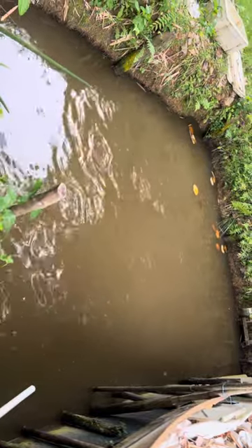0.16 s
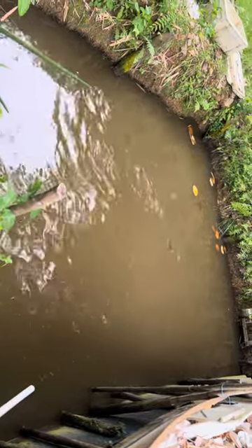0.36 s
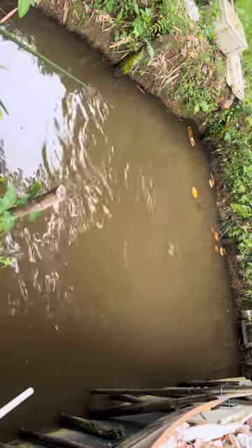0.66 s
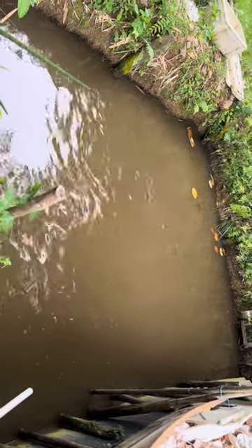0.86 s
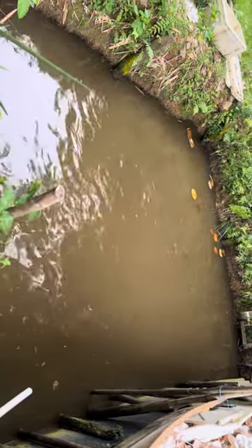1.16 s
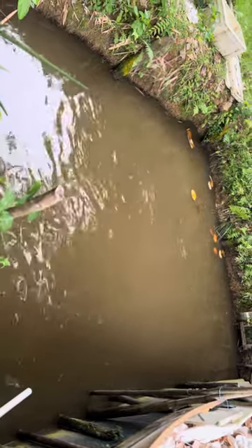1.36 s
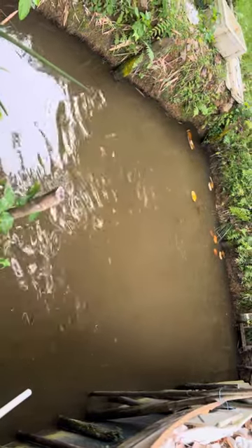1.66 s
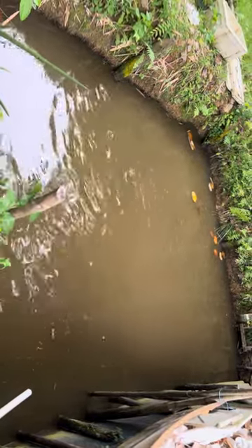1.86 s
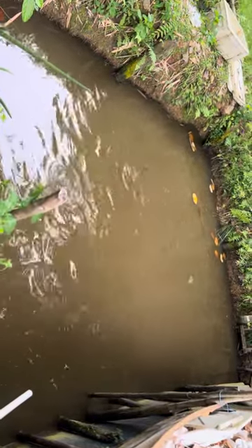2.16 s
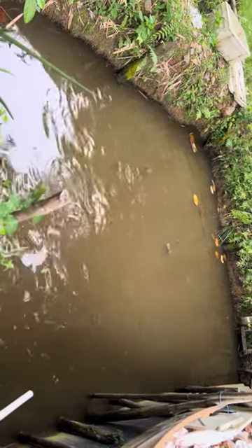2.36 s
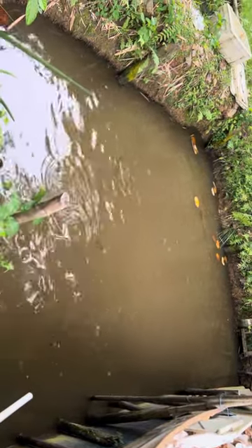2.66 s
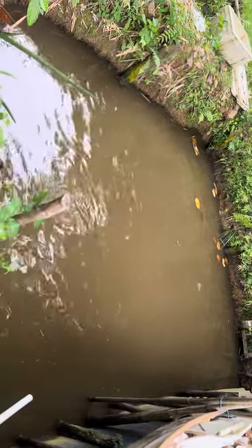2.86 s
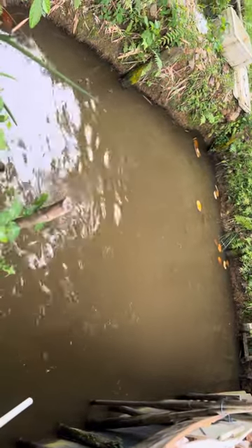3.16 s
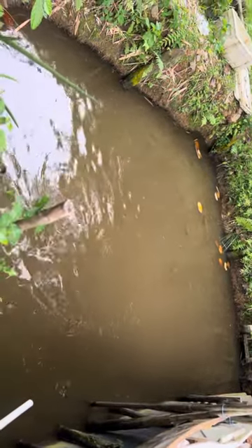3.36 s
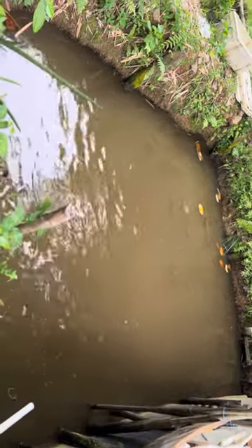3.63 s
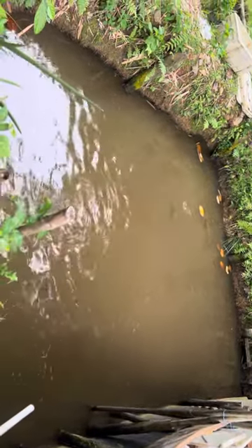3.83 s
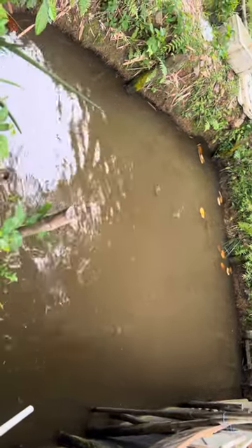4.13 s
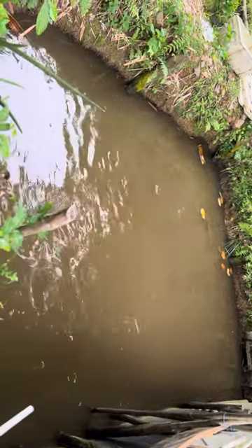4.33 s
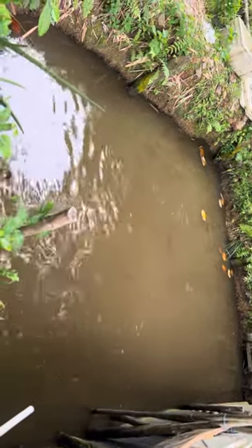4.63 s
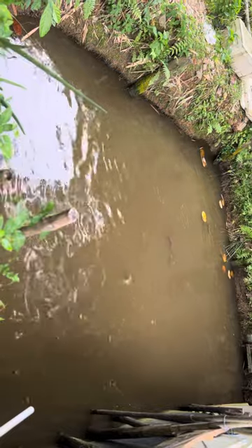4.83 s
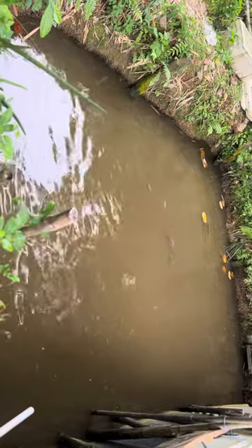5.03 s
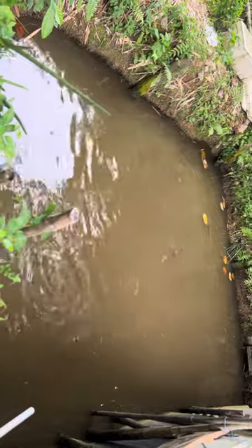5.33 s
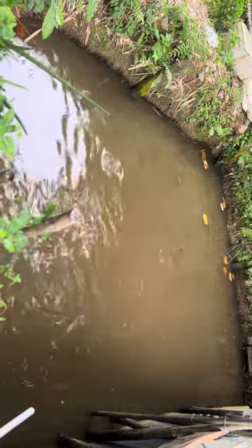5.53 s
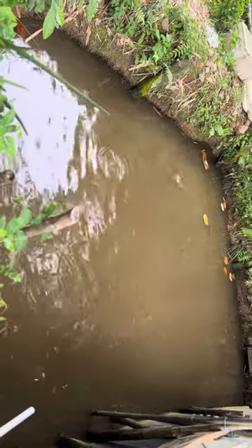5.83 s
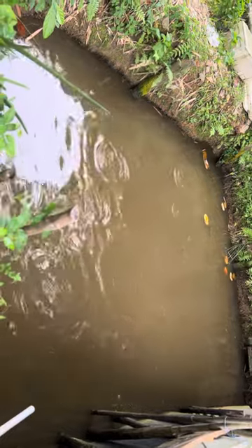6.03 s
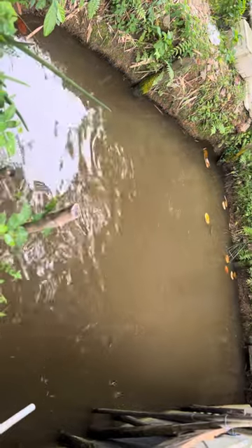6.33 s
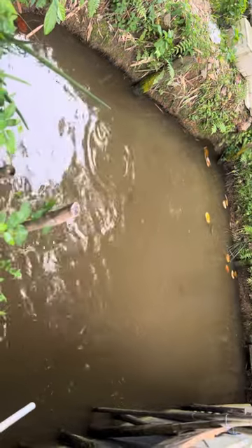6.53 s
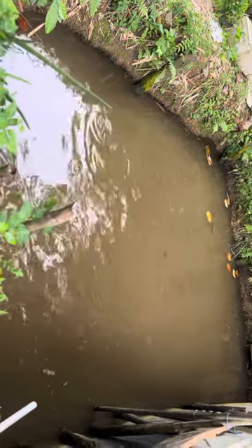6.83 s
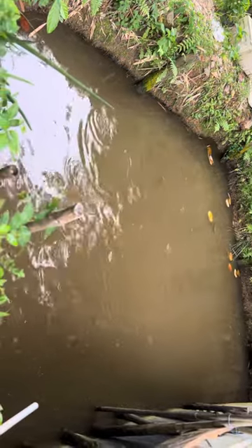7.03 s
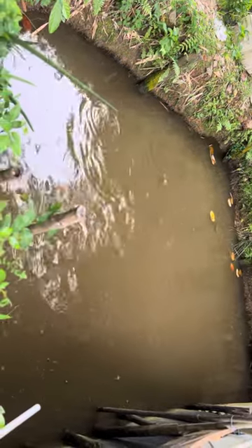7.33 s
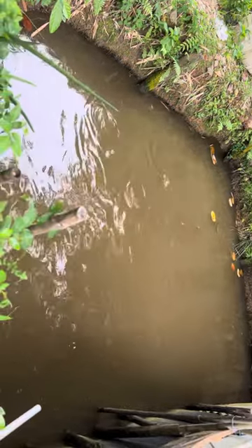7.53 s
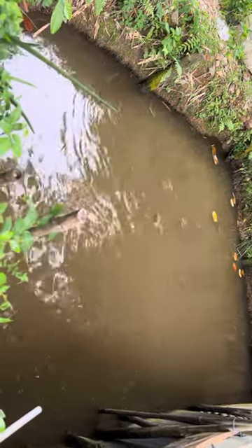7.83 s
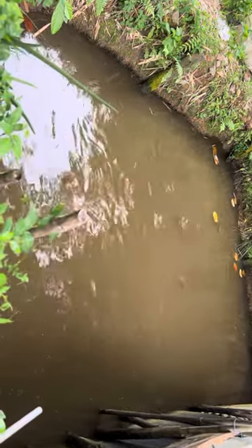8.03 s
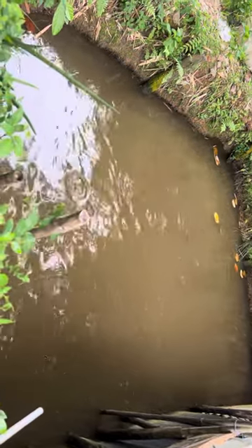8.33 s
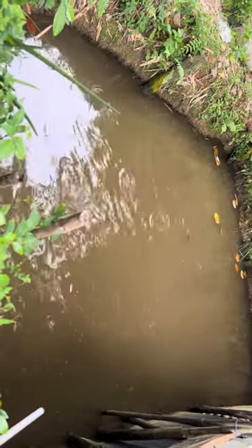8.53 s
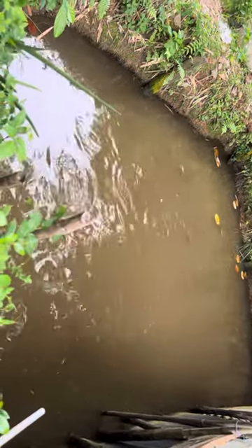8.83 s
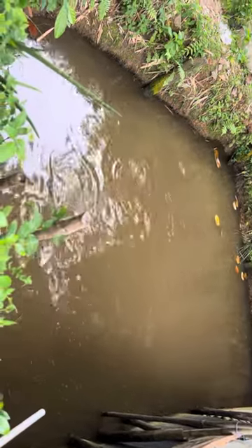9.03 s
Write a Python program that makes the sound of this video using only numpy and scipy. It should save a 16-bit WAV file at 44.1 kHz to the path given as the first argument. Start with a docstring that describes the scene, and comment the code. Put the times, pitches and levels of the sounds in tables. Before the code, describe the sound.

Beside a muddy, leafy pond, small animals give short rising chirps two or three times a second, echoing off the banks. A distant motorbike revs and fades over low rumble, road wash and thin insect buzz. A faint raspy squeak comes early, then ticks, soft plops and bubbles. Near the end a brittle snap is the loudest sound, close to the microphone, as a fainter motorbike revs.

```python
"""Beside a muddy pond, small animals call all the way through in short rising chirps, swept tones with echoes.
At first a motorbike, a stack of firing harmonics, revs up far off over rumble, wash, hiss and insect buzz.
A raspy squeak rings at 1.4 s; from 2.7 s come noise ticks, narrow noisy trills and gliding water plops.
Rising bubbles gurgle from 4.8 s, a fainter motorbike joins at 6.9 s and a run of cracks snaps close by at 7.9 s."""
import sys
import numpy as np
from scipy import signal
from scipy.fft import rfft, irfft
from scipy.io import wavfile
from scipy.ndimage import uniform_filter1d

SR = 44100
rng = np.random.default_rng(int(sys.argv[2]) if len(sys.argv) > 2 else 0)


def master_out(mix):
    """Clip the mix to full scale and print it as 16-bit PCM to the path in sys.argv[1]."""
    frames = np.transpose(np.atleast_2d(mix))
    ceiling = np.clip(frames, -1, 1)
    pcm = np.round(ceiling * 32767).astype(np.int16)
    wavfile.write(sys.argv[1], SR, pcm)


N = 404838
TIME = np.arange(N) / SR

CALL_LEAD_S, CALL_LEAD_DB = 0.035, -10.5  # a faint glide leads into each sweep from below
LOUD_CALL_DB = -42.5  # in calls softer than this the fundamental stands out more
# The animals' calls. Each row: start in seconds, length in seconds, top of the strong second partial in Hz,
# level in dB (rms over a typical call length), far echo in dB, third partial in dB against the second,
# swell from 0 (abrupt) to 1 (gradual).
CHIRPS = [ (-.05, 0.11, 1663, -52, 0, -17, 0.15), (0.317, 0.12, 1657, -54.5, -0.5, -17, 0.27),
          (0.826, 0.098, 1860, -52.5, -4, -18, 0.26), (1.226, 0.15, 1685, -55.5, 2, -25, .1),
          (1.605, 0.097, 1877, -51.5, 0, -23, 0.28), (2.009, 0.098, 1646, -55.5, 8, -19, 0.14),
          (2.37, 0.1, 1855, -50, 3, -35, 0.15), (2.705, 0.08, 1737, -45, 2, -18, 0.41),
          (2.777, 0.082, 1918, -50.5, 9, -16, 0.41), (3.105, 0.13, 1894, -50.5, -1.5, -34, 0.076),
          (3.295, .085, 1927, -52.5, 4.5, -27, 0.3), (3.468, 0.08, 1640, -55.5, -3, -21, 0.046),
          (3.56, .088, 1790, -43, -4.5, -23, 0.77), (3.668, 0.1, 1960, -53.5, 4, -25, 0.6),
          (4.023, .11, 1930, -51.5, 1, -24, 0.38), (4.278, 0.093, 1836, -42, -3, -25, 0.29),
          (4.406, 0.11, 1925, -53, 3.5, -24, 0.44), (4.844, 0.1, 1820, -41, -5.5, -23, 0.36),
          (5.212, 0.089, 1837, -43, -5, -17, 0.72), (5.56, 0.096, 1823, -43.5, -2.5, -16.5, 0.49),
          (5.871, 0.077, 1691, -52, 3, -8, 0.44), (5.907, 0.11, 1819, -51, -17, -13, .5),
          (6.445, .11, 1870, -64, 0, -21, .2), (6.7, 0.089, 1780, -54.5, -2, -30, .25),
          (7.18, .11, 1857, -61, -2, -30, .1), (7.367, 0.097, 1786, -52, -3.5, -16, 0.44),
          (7.543, 0.14, 1940, -60.5, -1, -23, .2), (7.886, .135, 1860, -58, -2, -32, .2),
          (8.221, 0.091, 1807, -51, 5, -24, 0.38), (8.412, 0.083, 1600, -59, 1, -36, .25),
          (8.614, 0.1, 1807, -50.5, 3.5, -32, 0.23), (8.979, 0.093, 1830, -50, 0, -31, .45)]
# Distinct reflections, which beat with the sweep and roughen it. Each row: delay in seconds, level in dB.
REFLECTIONS = [(0.011, -6.5), (0.019, -4), (.075, -13.5)]


def chirps(low_db=-21, low_share=0.64, third_fade_s=0.39, rough=0.29, air_db=-18, scatter=1.65,
           typical_s=0.11, near_t60=0.25, far_t60=0.6, size=36000):
    """The throat favours the second partial, most of all in loud calls; reflections blur the weak partials."""
    out = np.zeros((2, N))
    t = np.arange(size) / SR
    build = np.minimum(0.4 + t / 0.07, 1)  # echoes from the far bank take a moment to build up
    for s, length_s, top_hz, db, echo_db, third_db, swell in CHIRPS:
        phase, effort, throat = whistle(t - CALL_LEAD_S, length_s, top_hz, swell)
        voice = (1 + rough * quiver(size)) * np.sin(2 * phase)
        call = effort * throat * (voice + undb(air_db) * air(size))
        reflected = sum(undb(gain_db) * np.interp(t - late_s, t, call, left=0)
                        for late_s, gain_db in REFLECTIONS)
        low = undb(low_db + low_share * (LOUD_CALL_DB - db)) * np.sin(phase)
        third = undb(third_db) * np.exp(-t / third_fade_s) * np.sin(3 * phase)
        source = call + effort * (low + third)
        near_path = echoes(near_t60, 2200, size=size)  # close scatter beats with the direct sound
        far_path = build * echoes(far_t60, 2700, size=size)
        near, far = (unit(signal.fftconvolve(source[None], path)[:, :size]) for path in (near_path, far_path))
        heard = unit(unit(call + reflected) + scatter * near + undb(echo_db) * far)
        add(out, s - CALL_LEAD_S, heard * undb(db) * np.sqrt(typical_s * SR / size))
    return out


# Every chirp's second partial sweeps up from the same pitch and holds its top for a moment.
CALL_START_HZ, CALL_HOLD_S = 1214, 0.011
# How strongly the throat passes the second partial. Each row: frequency in Hz, gain in dB.
THROAT = [(1200, -9), (1350, -6.5), (1450, -2.5), (1600, 0), (1780, -1.5), (1950, -3)]


def whistle(t, length_s, top_hz, swell, waver=0.0087, bend=1.2):
    """Fundamental phase, effort and throat gain of one call: it sweeps up, swells, holds a moment and stops."""
    u = np.minimum(t / length_s, 1)
    hz = top_hz - (top_hz - CALL_START_HZ) * (1 - u) ** bend  # second partial
    lead_in = undb(CALL_LEAD_DB) * np.minimum(1 + t / CALL_LEAD_S, 1)
    rise = np.maximum(u, 0) ** max(swell, 0.01)
    stop = np.clip((length_s + CALL_HOLD_S - t) / 0.01, 0, 1)
    effort = np.maximum(rise, lead_in) * stop
    phase = np.pi * np.cumsum(hz * (1 + waver * quiver(len(t)))) / SR  # pi, not 2 pi: half the pitch
    return phase, effort, colour(hz, THROAT)


def quiver(size):
    """Quick, smooth unsteadiness of a voice, rms 1."""
    return unit(uniform_filter1d(uniform_filter1d(rng.standard_normal(size), size=200), size=200))


def air(size, centre_hz=1600, width_hz=480):
    """Air rushing through the throat's resonance, rms 1."""
    hz = np.arange(size // 2 + 1) * SR / size
    return unit(irfft(rfft(rng.standard_normal(size)) * band(hz, centre_hz, width_hz), size))


CRACK_T60_S, CRACK_WIDTH = 0.0093, 0.72  # decay by 60 dB; filter width as a share of the centre frequency
# The snap is a quick run of cracks. Each row: start in seconds, peak in dB, centre in Hz.
SNAP = [(7.8615, -38, 2800), (7.868, -21, 2043), (7.87, -29, 5620), (7.8764, -27, 6310), (7.878, -39, 7940)]
# What the snapped thing rings with after its loudest crack. Each row: centre in Hz, filter width in Hz,
# peak in dB, time to decay by 60 dB in seconds.
SNAP_RING = [(990, 2500, -30.5, 0.036), (2300, 2200, -33, 0.015), (2450, 1200, -56, .2),
             (12600, 2160, -42.5, 0.099)]


def snap(ring_delay_s=0.003, spatter_delay_s=0.017):
    """Something brittle gives way in a few cracks and rings briefly after the loudest; small bits spatter."""
    out = np.zeros((2, N))
    for s, db, hz in SNAP:
        add(out, s, burst(db, hz, CRACK_WIDTH * hz, CRACK_T60_S))
    loudest_s = max(SNAP, key=lambda crack: crack[1])[0]
    for hz, width, db, t60 in SNAP_RING:
        add(out, loudest_s + ring_delay_s, burst(db, hz, width, t60))
    return out + spatter(loudest_s + spatter_delay_s)


TICK_WIDTH = 0.95  # filter width as a share of the centre frequency
# The spatter's length, highest first peak, change over its length and middle pitch.
SPATTER_S, SPATTER_DB, SPATTER_FADE_DB, SPATTER_HZ = 0.07, -43, -11, 1910


def spatter(s, spread_octaves=1.5, t60=0.022, scatter_db=6, count=30):
    """A grainy, fading spray of tiny ticks at random pitches."""
    out = np.zeros((2, N))
    for k, (late, pitch, weaker) in enumerate(rng.random((count, 3))):
        u = (k + late) / count
        hz = SPATTER_HZ * 2 ** (spread_octaves * (2 * pitch - 1))
        db = SPATTER_DB + SPATTER_FADE_DB * u - scatter_db * weaker
        add(out, s + u * SPATTER_S, burst(db, hz, TICK_WIDTH * hz, t60, size=3000))
    return out


RING_HZ = 300  # the lengths below hold at this pitch
# Length in seconds, and end pitch over start pitch.
PLOP_S, PLOP_GLIDE = 0.013, 0.745
BUBBLE_S, BUBBLE_GLIDE = 0.036, 1.435
# Plops, which sink in pitch. Each row: start in seconds, start pitch in Hz, peak in dB.
PLOPS = [ (2.949, 430, -46), (3.519, 445, -43), (3.954, 104, -38.5), (4.264, 316, -43), (4.274, 69.5, -30),
         (4.429, 300, -51), (4.438, 76.7, -26.5), (5.199, 324.7, -43.5), (5.546, 300, -42.5),
         (5.834, 418, -43.5), (6.245, 198.5, -37.5), (6.424, 108, -30), (6.607, 320, -49),
         (7.879, 530, -37), (8.762, 487.5, -42)]
# Gurgling bubbles, which rise in pitch. Each row: start in seconds, start pitch in Hz, peak in dB.
BUBBLES = [(4.814, 1340, -57.5), (5.368, 1160, -51), (5.389, 944, -48.5), (5.706, 272, -42.5),
           (5.738, 405.8, -48), (5.762, 674.4, -48)]


def plops(rows, length_s, glide, fade=1.0):
    """Air pockets in the water ring briefly, gliding as they change size; big, low ones last longer."""
    out = np.zeros((2, N))
    for s, hz, db in rows:
        u = np.linspace(0, 1, int(length_s * np.sqrt(RING_HZ / hz) * SR))
        phase = 2 * np.pi * np.cumsum(hz * glide ** u) / SR
        ring = np.minimum(u / 0.086, 1) * np.exp(-fade * u) * np.minimum((1 - u) / 0.028, 1)
        add(out, s, undb(db) * ring / ring.max() * np.sin(phase))
    return out


# Ticks in clusters: time to decay by 60 dB, filter width, and how much weaker than the peak a tick may be.
CLUSTER_T60_S, CLUSTER_WIDTH_HZ, CLUSTER_SCATTER_DB = 0.062, 1600, 14
# Faint ticks and taps. Each row: start in seconds, peak in dB, centre in Hz,
# time to decay by 60 dB in seconds.
TICKS = [ (2.75, -42, 1390, .04), (2.788, -54, 4950, 0.017), (3.4991, -46, 3080, .015),
         (3.5185, -33, 1160, 0.01), (4.481, -52, 2300, 0.046), (5.167, -52, 4020, 0.046),
         (5.1981, -35.5, 1060, 0.021), (5.382, -50, 2700, .04), (5.833, -41, 1300, 0.032),
         (6.64, -59, 8910, .04), (7.493, -45.5, 1299, 0.039), (7.755, -48, 3400, .03),
         (7.797, -48.5, 3397, 0.022), (8.585, -48, 2290, 0.038), (8.778, -46, 2490, 0.032)]
# Faint clusters of tiny noise ticks, very high near 13 kHz but for one near 6 kHz.
# Each row: start in seconds, length in seconds, highest peak in dB, centre in Hz.
TICK_CLUSTERS = [(2.716, 0.1, -58, 13300), (2.937, .1, -61, 13200), (3.094, 0.069, -63, 13300),
                 (3.499, 0.064, -51, 5950), (5.22, 0.13, -61, 13100)]


def ticks(count=7):
    """Small dry sounds, each a decaying noise burst: single ticks, and clusters scattered at random in time."""
    out = np.zeros((2, N))
    for s, db, hz, t60 in TICKS:
        add(out, s, burst(db, hz, TICK_WIDTH * hz, t60))
    for s, length_s, db, hz in TICK_CLUSTERS:
        for when, weaker in rng.random((count, 2)):
            tick = burst(db - CLUSTER_SCATTER_DB * weaker, hz, CLUSTER_WIDTH_HZ, CLUSTER_T60_S)
            add(out, s + when * length_s, tick)
    return out


SQUEAK_AT_S, SQUEAK_S, SQUEAK_T60_S = 1.395, 0.056, 0.024  # start, length, decay of each jerk by 60 dB
# Resonances of one raspy squeak. Each row: centre in Hz, filter width in Hz, peak of the first jerk in dB.
SQUEAK = [(3310, 480, -50.5), (4640, 350, -48), (5350, 580, -52.5), (3800, 5100, -48)]


def squeak(jitter=0.17, fall_db=-4, tail_db=-4, tail_t60=0.31, count=7):
    """A quick run of stick-slip jerks rings a few high resonances; the banks draw it out."""
    out = np.zeros((2, N))
    for k, late in enumerate(rng.standard_normal(count)):
        s = SQUEAK_AT_S + SQUEAK_S * (k + jitter * late) / count
        for hz, width, db in SQUEAK:
            add(out, s, burst(db + fall_db * k / count, hz, width, SQUEAK_T60_S))
    tail = signal.fftconvolve(out[:1], echoes(tail_t60, 6000))[:, :N]
    return out + undb(tail_db) * tail


def burst(db, hz, width, t60, spread=0.81, size=16000):
    """A short burst of tiny fractures, as decaying noise, through one broad resonance."""
    t = np.arange(size) / SR
    mid, side = rng.standard_normal((2, size)) * undb(-60 * t / t60)
    b, a = signal.iirpeak(min(hz, SR / 2 - 1000), hz / min(width, SR / 3), fs=SR)
    once = signal.lfilter(b, a, [mid + spread * side, mid - spread * side])
    sound = signal.lfilter(b, a, once)  # the second pass steepens the resonance
    return sound / abs(sound).max() * undb(db)


# Steady buzzers. Each row: centre in Hz, width in Hz, pulses per second, pulse depth,
# level in dB before the slow swell.
INSECTS = [(7052, 330, 43, 0.066, -67.5), (8114, 830, 230, 0.092, -69.5), (8130, 88, 130, 0.42, -90.5),
           (9230, 590, 330, 0.075, -72), (6840, 890, 5, 0.85, -76)]
# One more insect sings in bouts. Each row: start in seconds, end in seconds.
BOUTS = [(.65, 1.2), (1.88, 2.25), (3.05, 4.8), (4.2, 5.8), (5.4, 12), (7.65, 8.14)]


def insects(bout_width_hz=240, bout_db=-73, flicker_db=0.6):
    """Wing strokes pulse narrow high resonances; one insect starts and stops."""
    def buzz(centre, width, rate, depth):
        """Noise in one resonance, pulsed by slightly unsteady strokes."""
        strokes = 1 + depth * np.sin(2 * np.pi * np.cumsum(rate * (1 + 0.0037 * walk(3.5))) / SR)
        hz = np.arange(N // 2 + 1) * SR / N
        ring = irfft(rfft(rng.standard_normal(N)) * band(hz, centre, width), N)
        return unit(ring * strokes) * undb(flicker_db * walk(3.5))
    chorus = sum(buzz(hz, width, rate, depth) * undb(db) for hz, width, rate, depth, db in INSECTS)
    bouts = sum(1.0 * ((TIME > a) & (TIME < b)) for a, b in BOUTS)  # overlapping bouts add up
    singing = uniform_filter1d(bouts, size=3000)
    soloist = singing * buzz(8920, bout_width_hz, 86, 0.9)
    swell_db = np.interp(TIME, [0, 4, 9], [-1.6, 0.3, 1.1])
    return from_side(chorus * undb(swell_db) + soloist * undb(bout_db))


# Faint far-off trills. Each row: start in seconds, end in seconds, centre in Hz, level in dB.
TRILLS = [(2.713, 3.1, 3270, -65), (3.6, 5.902, 2890, -75), (6.239, 6.519, 4632, -79),
          (6.44, 6.658, 4000, -79), (6.67, 6.98, 3100, -79), (6.83, 7.182, 3980, -76),
          (6.9, 7.6, 4500, -78.5), (7.28, 7.432, 3960, -73)]


def trills(width_hz=330, fade_s=0.055, flicker_db=1):
    """Far-off trills, blurred by distance to narrow flickering bands."""
    out = np.zeros((2, N))
    for start, end, hz, db in TRILLS:
        noise = diffuse(lambda f: band(f, hz, width_hz))
        out += noise * gate(start, end, fade_s) * undb(db + flicker_db * walk(25))
    return out


BIKE_FADE_S, COAST_S = 0.72, 1.08  # fade in and out; time from throttle shut to silence
# The exhaust colour moves up with the revs: firing rate at which it stands as listed, and
# the share of the rise (in octaves) that it follows.
EXHAUST_AT_HZ, EXHAUST_FOLLOW = 42, 0.38
# Motorbikes pulling away. Each row: start in seconds, throttle shut in seconds, top firing rate in Hz,
# growth of the rate per second, level at the top in dB before the exhaust colour.
BIKES = [(-.6, 2.4, 47.82, .128, -42), (6.9, 9.2, 43.23, .151, -49.5)]
# Their exhaust as it carries over the distance. Each row: frequency in Hz, gain in dB.
EXHAUST = [(35, -17.5), (75, -1.5), (115, 0.5), (160, -12), (205, -18.5), (250, -3.5), (300, 0.5),
           (345, -10.5), (400, -9), (490, -15), (620, -43), (900, -66.5)]


def motorbike(start_s, shut_s, top_hz, growth, top_db, jitter=0.00463, fade_db=0.64, rough=0.82, count=18):
    """Firing-rate harmonics pass through the exhaust colour; each fades on its own on the long way here."""
    hz, db = throttle(shut_s, top_hz, growth)
    phase = 2 * np.pi * np.cumsum(hz * (1 + jitter * walk(14))) / SR
    out = np.zeros((2, N))
    heard = gate(start_s, shut_s + COAST_S, BIKE_FADE_S)
    on = heard > 0
    shift = (hz[on] / EXHAUST_AT_HZ) ** EXHAUST_FOLLOW
    for k in range(1, count):
        fading = undb(fade_db * walk(3.814)) * (1 + rough * walk(30))
        gain = fading[on] * colour(k * hz[on] / shift, EXHAUST)
        angle = k * phase[on] + rng.uniform(0, 2 * np.pi)
        lag = np.pi * k * hz[on] * 0.00035  # the left side hears it 0.35 ms after the right
        out[:, on] += gain * np.array([0.81 * np.sin(angle - lag), 0.7 * np.sin(angle + lag)])
    return out * heard * undb(top_db + db)


REV_DB_PER_OCTAVE = 14  # louder with the revs
SHUT_DB, SHUT_S, SAG_PER_S = -10.5, 0.21, 0.36  # off the throttle the level drops and the revs sag


def throttle(shut_s, top_hz, growth):
    """Firing rate and relative level of an engine that revs up steadily, then coasts."""
    before, after = np.minimum(TIME - shut_s, 0), np.maximum(TIME - shut_s, 0)
    hz = top_hz * np.exp(growth * before - SAG_PER_S * after)
    db = REV_DB_PER_OCTAVE * np.log2(hz / top_hz) + SHUT_DB * np.minimum(after / SHUT_S, 1)
    return hz, db


# Deep engine drone from the road, one list of rows for each vehicle.
# Each row: time in seconds, pitch in Hz, level in dB before the trim.
DRONE = [
    [(0.0, 78.1, -40.5), (0.68, 78.47, -34.5), (0.77, 77.23, -43.5), (1.44, 79.5, -33.5), (1.64, 79.8, -44),
     (1.83, 88.95, -36), (2.04, 81.1, -36.5), (2.49, 78.75, -43.5), (2.94, 78.0, -34.5), (3.25, 67.9, -39),
     (3.63, 61, -39), (3.8, 60, -64)],
    [(4.3, 66.3, -51), (4.48, 66.9, -53), (4.73, 79.4, -43), (5.17, 75.36, -48.5), (5.71, 89.6, -40.5),
     (6.13, 81.46, -40.5), (6.31, 87.3, -44.5), (6.79, 73.7, -41), (6.99, 63.5, -43), (7.51, 62.2, -40),
     (8.69, 78.95, -40.5), (9.18, 83.26, -36.5)],
]
# Trim added to each vehicle's level, in dB, one number per vehicle.
DRONE_TRIM_DB = [0.5, -2.5]


def drone(rows, trim_db, waver_db=0.85, jitter=0.012, fade_s=0.029):
    """Only the lowest engine note carries from the heavier traffic."""
    hz, db = curves(rows)
    phase = 2 * np.pi * np.cumsum(hz * (1 + jitter * walk(12))) / SR
    heard = gate(rows[0][0] - fade_s, rows[-1][0] + fade_s, fade_s)
    return from_side(np.sqrt(2) * np.sin(phase) * heard * undb(db + trim_db + waver_db * walk(9)))


RUMBLE_DB, WASH_DB, HISS_DB = -41.5, -53.5, -67.5  # levels before swells and wandering
# Wash and hiss swell once: middle and width in seconds, then the rise of each in dB.
SWELL_AT_S, SWELL_WIDTH_S, SWELL_WASH_DB, SWELL_HISS_DB = 2.01, 1, 3.5, 4.5
# Tone colours of rumble, wash and hiss. Each row: frequency in Hz, relative level in dB.
RUMBLE = [(20, -8), (30, -22.5), (42, 0.5), (58, 8), (80, 1.5), (100, 1), (125, -8.5), (170, -19.5),
          (260, -41), (400, -87.5)]
WASH = [(90, -7), (170, 7.5), (280, 3), (420, 0), (620, -6.5), (880, -9.5), (1200, -14.5), (1700, -20),
        (2500, -72.5)]
HISS = [(900, -6.5), (1700, 4.5), (2600, 6), (3600, 3.5), (4600, 2.5), (5600, -4), (6500, -10), (9000, 4.5),
        (10000, -53.5), (13500, -17.5), (15500, -34.5)]


def background(flutter_db=0.77, heave_db=1.5):
    """Low rumble, the wash of the road and a thin hiss of leaves, each coloured noise that wanders in level."""
    swell = np.exp(-((TIME - SWELL_AT_S) / SWELL_WIDTH_S) ** 2)
    rumble_db = RUMBLE_DB + heave_db * walk(7.4)
    wash_db = WASH_DB + SWELL_WASH_DB * swell + flutter_db * walk(16)
    hiss_db = HISS_DB + SWELL_HISS_DB * swell + 0.5 * walk(22)
    rumble = diffuse(lambda hz: colour(hz, RUMBLE)) * undb(rumble_db)
    wash = diffuse(lambda hz: colour(hz, WASH)) * undb(wash_db)
    hiss = diffuse(lambda hz: colour(hz, HISS)) * undb(hiss_db)
    return rumble + wash + hiss


# Width of the sound from all around. Each row: frequency in Hz, side minus mid in dB.
WIDTH = [(60, -29.5), (120, -24.5), (200, -22.5), (380, -13), (700, -4.5), (1400, -14.5), (2400, -1),
         (4400, -3), (8000, -8)]
# How far its left side leads. Each row: frequency in Hz, phase in radians.
LEFT_LEAD = [(150, 0), (300, -0.6), (500, -1.07), (850, -5), (1100, -5), (1850, -6), (2400, -4.5),
             (2900, -3.5), (3300, -6), (4700, -7), (5400, -3.5), (9900, 5.5)]


def diffuse(shape, size=N):
    """Stereo noise arriving from all around, with the gain shape(Hz), rms 1."""
    hz = np.arange(size // 2 + 1) * SR / size
    mid, side = rfft(rng.standard_normal((2, size))) * shape(hz)
    side = side * colour(hz, WIDTH)
    lead = np.exp(1j * np.interp(hz, *np.transpose(LEFT_LEAD)))
    return unit(irfft(np.array([(mid + side) * lead, mid - side]), size))


def echoes(t60, top_hz, size=26000):
    """Dense reflections from banks and leaves, as decaying noise of unit energy."""
    fall = undb(-60 * np.arange(size) / SR / t60)
    tail = diffuse(lambda hz: 1 / (1 + (hz / top_hz) ** 2), size=size) * fall
    return unit(tail) / np.sqrt(size)


RIGHT_LAG = 11  # samples


def from_side(x):
    """A sound from the left reaches the right side a moment later."""
    return np.array([x, np.pad(x, (RIGHT_LAG, 0))[:N]])


def undb(db):
    """Decibels to gain."""
    return 10 ** (np.asarray(db) / 20)


def unit(x):
    """Scale to rms 1."""
    return x / np.sqrt(np.mean(x ** 2) + 1e-30)


def curves(rows):
    """Columns of a time table, joined by straight lines."""
    s, *columns = np.transpose(rows)
    return [np.interp(TIME, s, c) for c in columns]


def colour(hz, points):
    """Gain of a (Hz, dB) spectrum at the given frequencies."""
    f, db = np.transpose(points)
    return undb(np.interp(np.log(np.maximum(hz, 1)), np.log(f), db))


def band(hz, centre, width):
    """Gain of a steep resonance."""
    return 1 / np.sqrt(1 + (2 * (hz - centre) / width) ** 6)


def walk(rate):
    """Smooth random wander through about rate new values per second."""
    knots = rng.standard_normal(int(N / SR * rate) + 2)
    line = np.interp(TIME * rate, np.arange(len(knots)), knots)
    return 1.2 * uniform_filter1d(line, int(SR / rate / 2))


def gate(start, end, fade_s):
    """Fade in after start, hold, fade out by end."""
    return np.clip(np.minimum(TIME - start, end - TIME) / fade_s, 0, 1)


def add(out, s, sound):
    """Mix a sound into out at time s."""
    start = int(round(s * SR))
    a, b = max(start, 0), min(start + sound.shape[-1], N)
    if b > a:
        out[:, a:b] += sound[..., a - start:b - start]


def scene(echo_db=-12, echo_t60=0.41, echo_hz=4000):
    """Everything around the pond; the near sounds echo faintly off the banks."""
    water = plops(PLOPS, PLOP_S, PLOP_GLIDE) + plops(BUBBLES, BUBBLE_S, BUBBLE_GLIDE)
    near = ticks() + squeak() + snap() + water
    banks = signal.fftconvolve(near.mean(axis=0)[None], echoes(echo_t60, echo_hz))[:, :N]
    road = sum(motorbike(*bike) for bike in BIKES) + sum(map(drone, DRONE, DRONE_TRIM_DB))
    return chirps() + insects() + trills() + road + background() + near + undb(echo_db) * banks


TOP_HZ = 15500


def record(dry):
    """A steep low-pass filter cuts the top."""
    return signal.sosfilt(signal.ellip(8, 0.2, 70, TOP_HZ, fs=SR, output="sos"), dry)


dry = scene()
out = record(dry)
master_out(out)
```